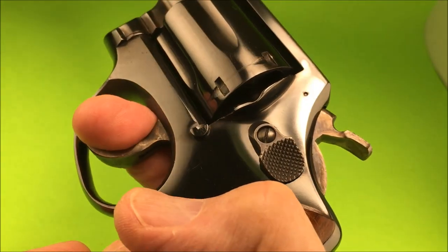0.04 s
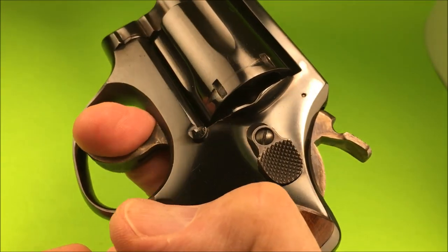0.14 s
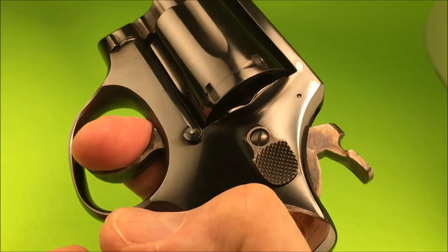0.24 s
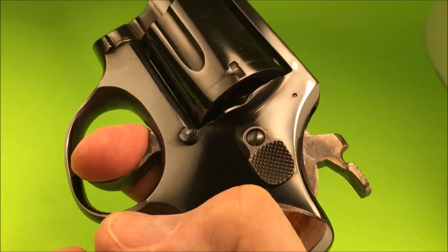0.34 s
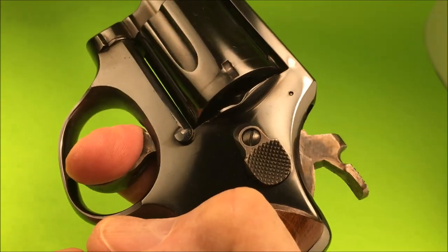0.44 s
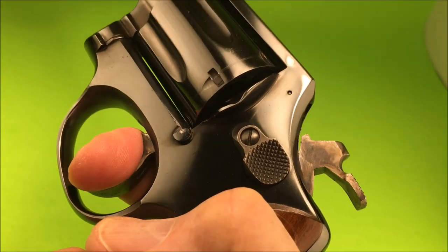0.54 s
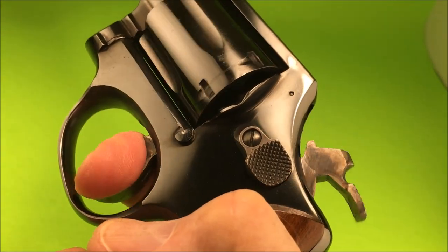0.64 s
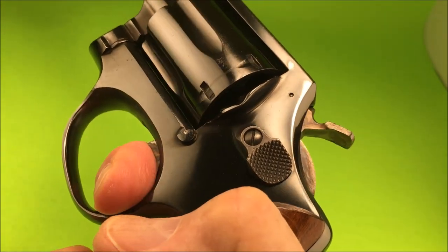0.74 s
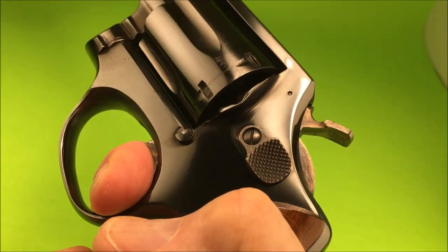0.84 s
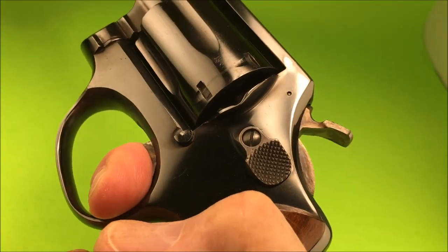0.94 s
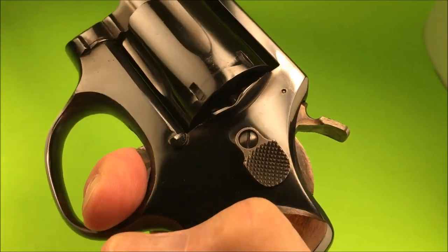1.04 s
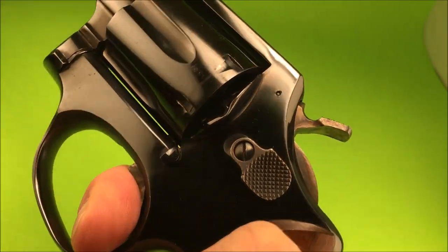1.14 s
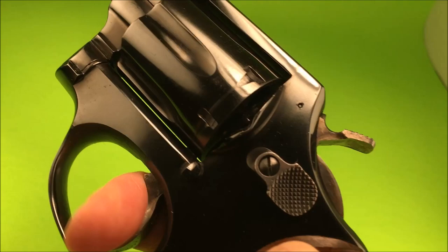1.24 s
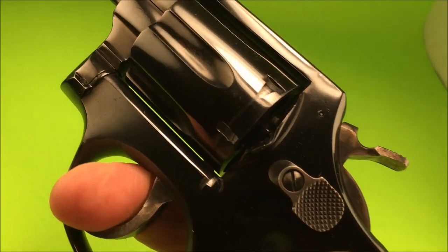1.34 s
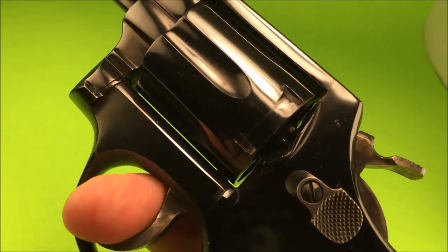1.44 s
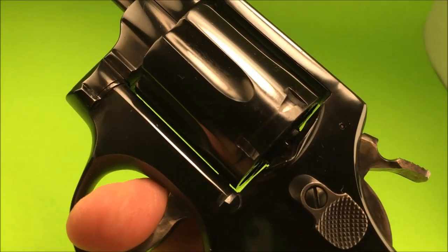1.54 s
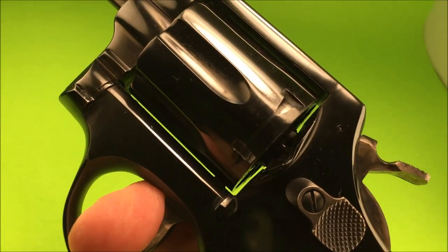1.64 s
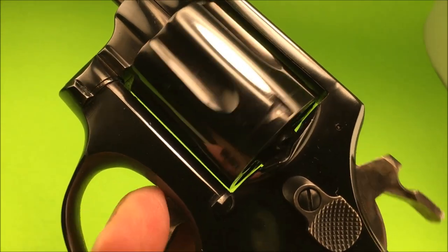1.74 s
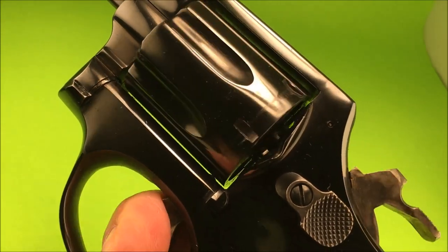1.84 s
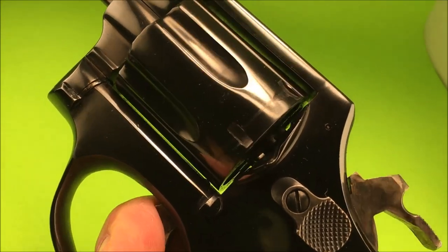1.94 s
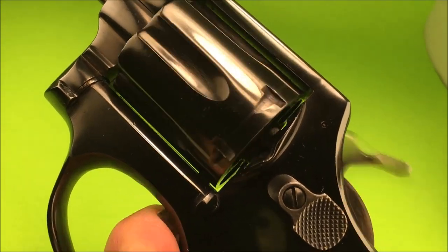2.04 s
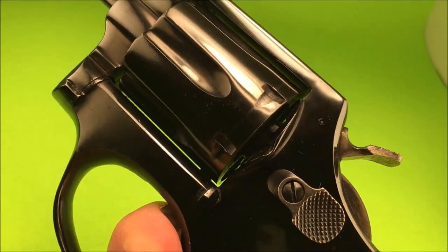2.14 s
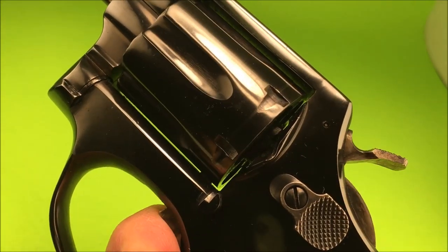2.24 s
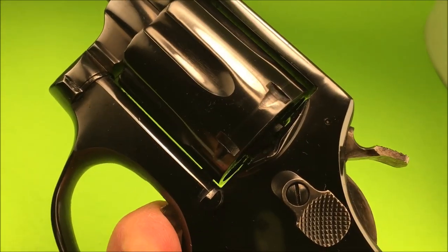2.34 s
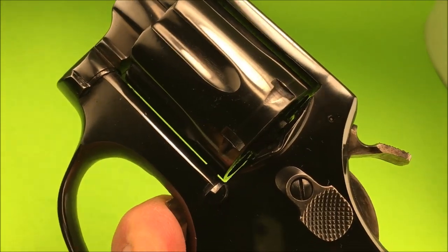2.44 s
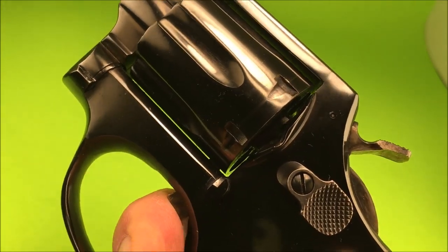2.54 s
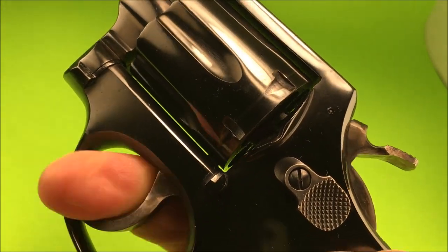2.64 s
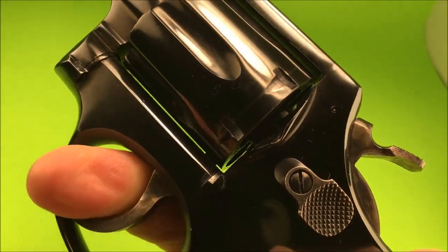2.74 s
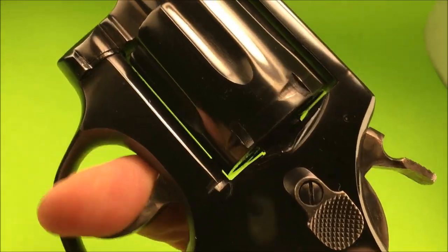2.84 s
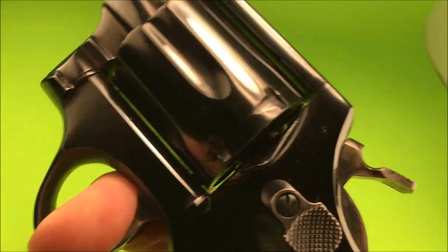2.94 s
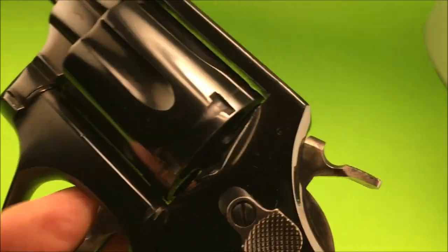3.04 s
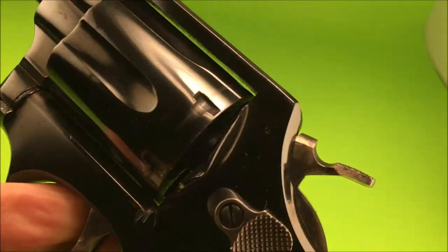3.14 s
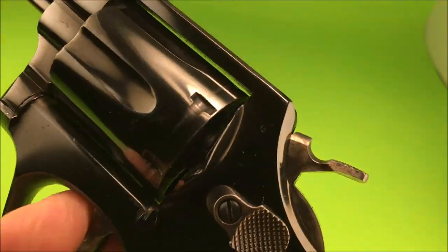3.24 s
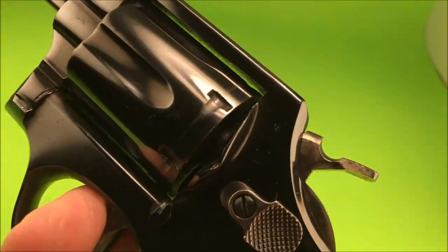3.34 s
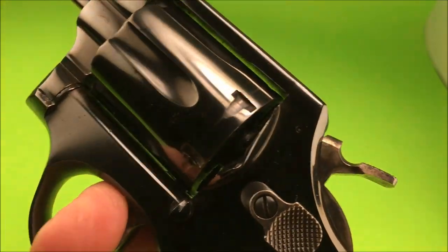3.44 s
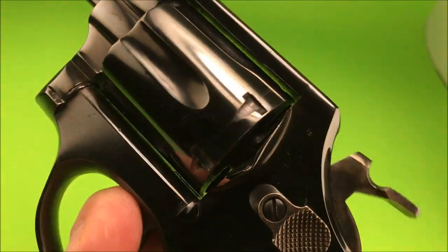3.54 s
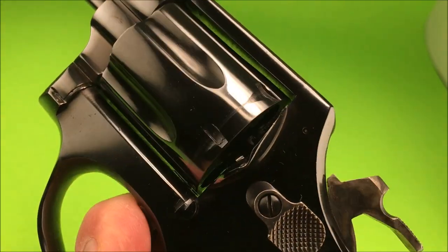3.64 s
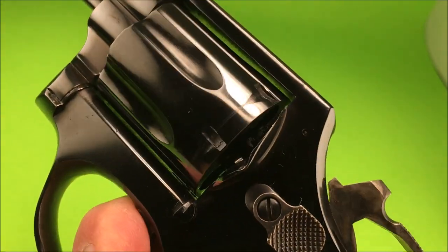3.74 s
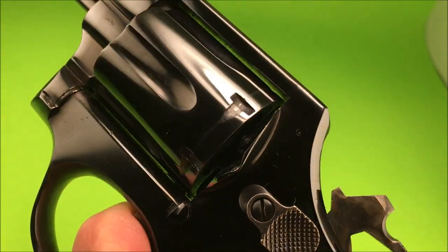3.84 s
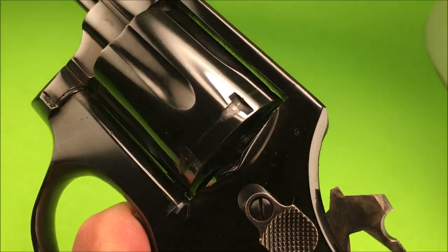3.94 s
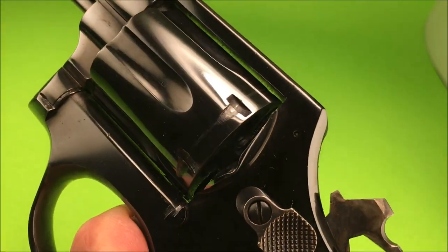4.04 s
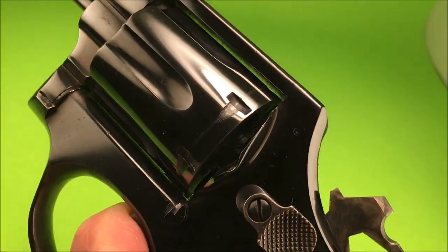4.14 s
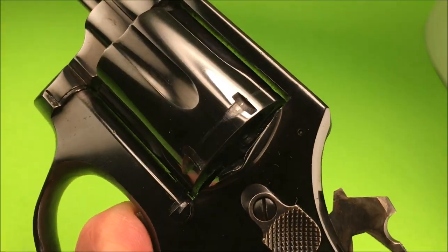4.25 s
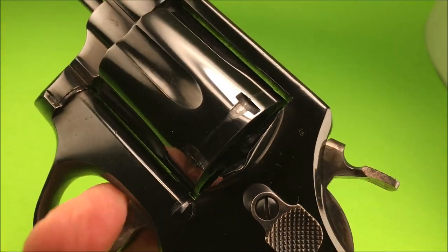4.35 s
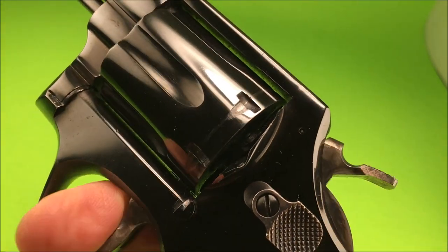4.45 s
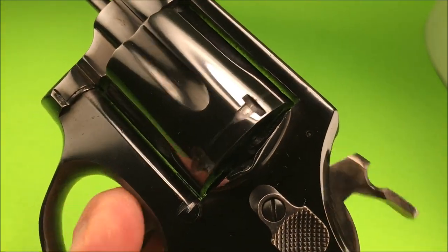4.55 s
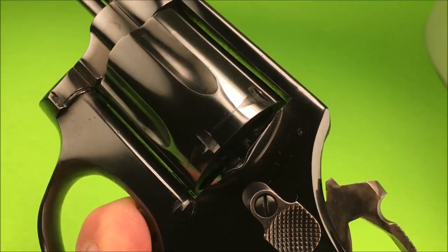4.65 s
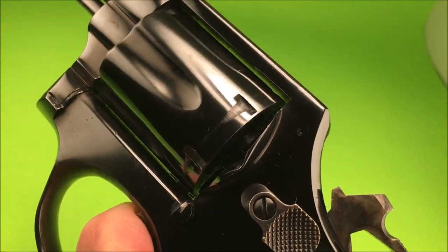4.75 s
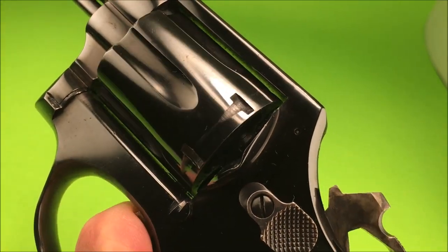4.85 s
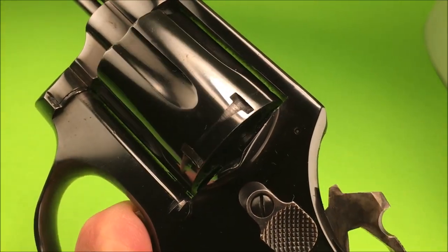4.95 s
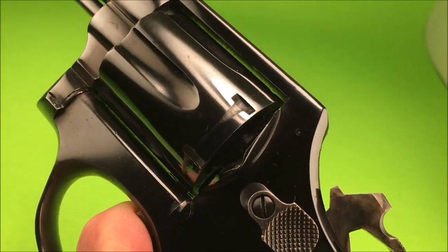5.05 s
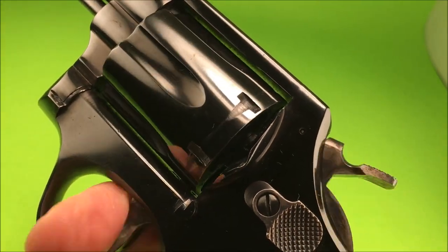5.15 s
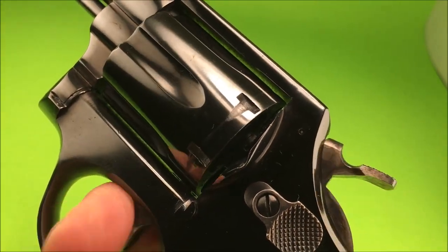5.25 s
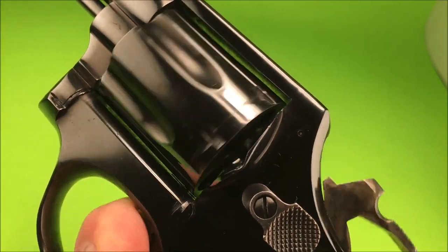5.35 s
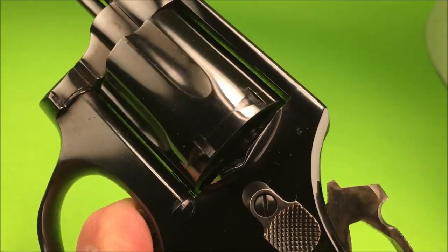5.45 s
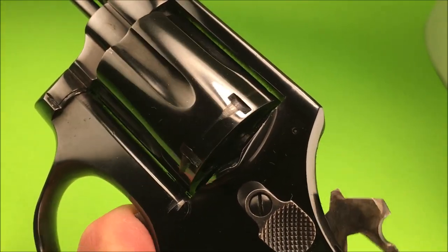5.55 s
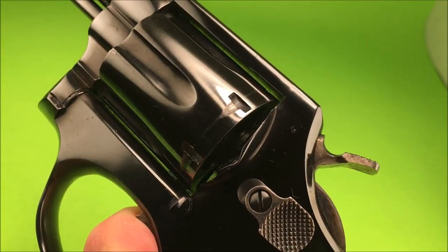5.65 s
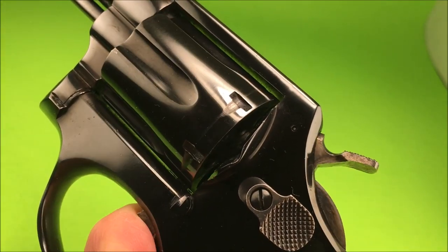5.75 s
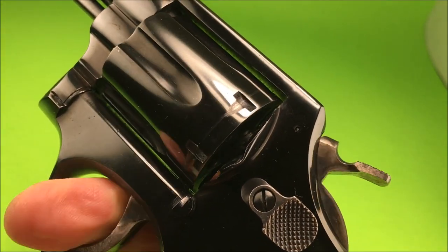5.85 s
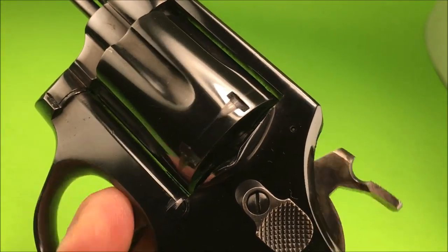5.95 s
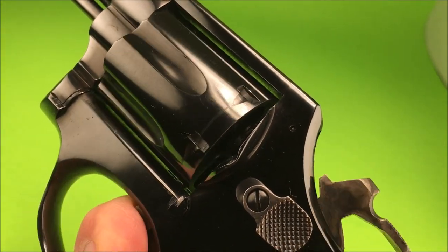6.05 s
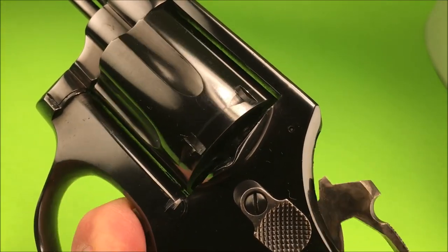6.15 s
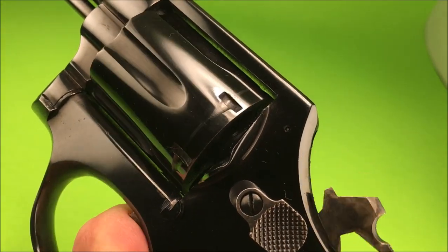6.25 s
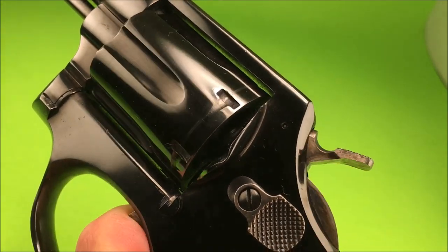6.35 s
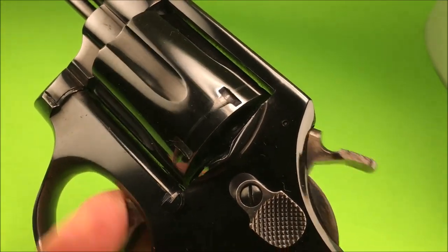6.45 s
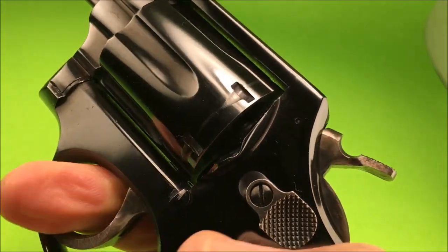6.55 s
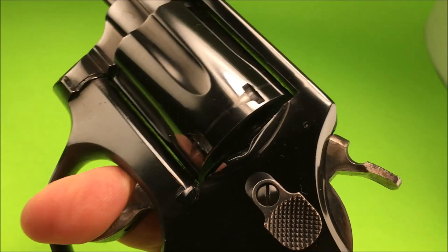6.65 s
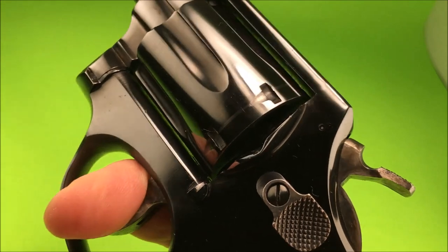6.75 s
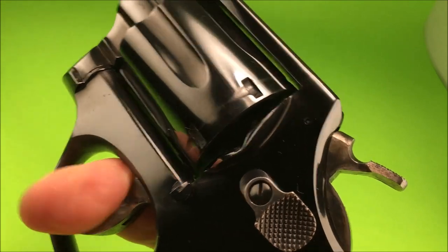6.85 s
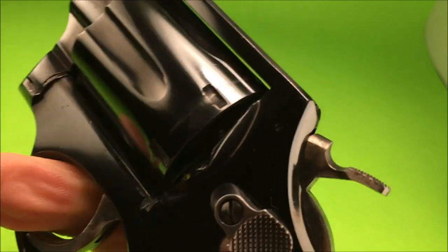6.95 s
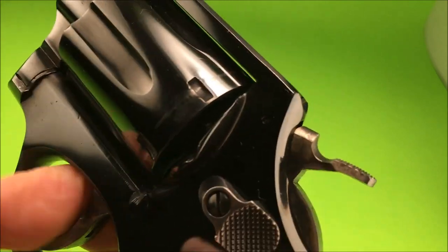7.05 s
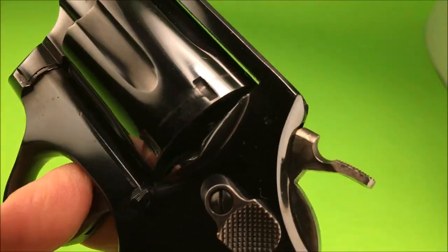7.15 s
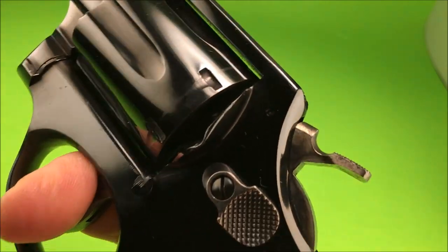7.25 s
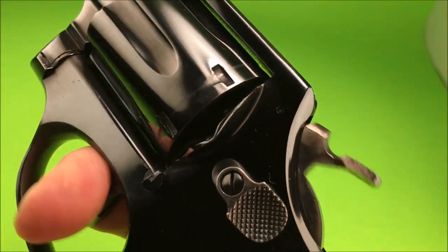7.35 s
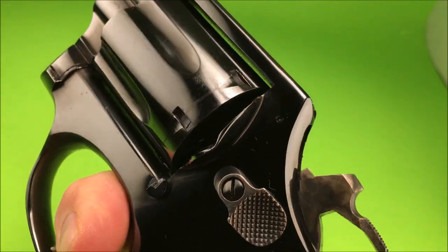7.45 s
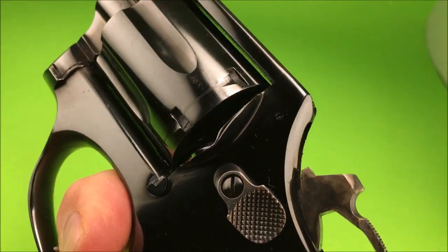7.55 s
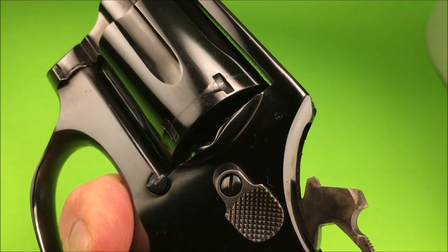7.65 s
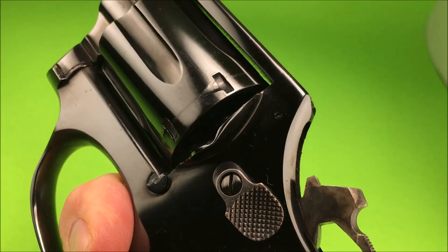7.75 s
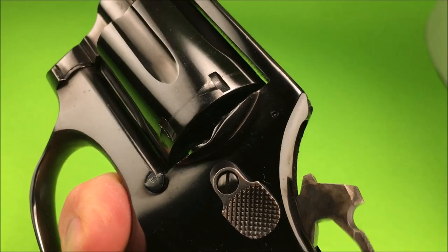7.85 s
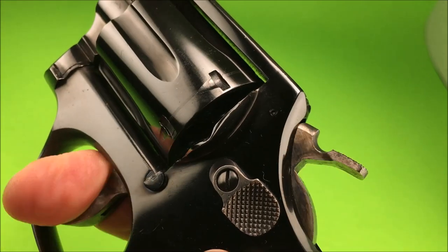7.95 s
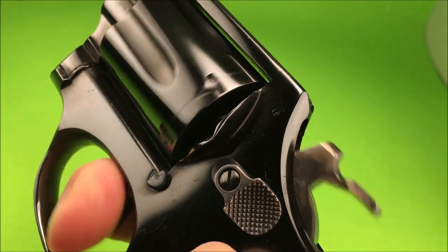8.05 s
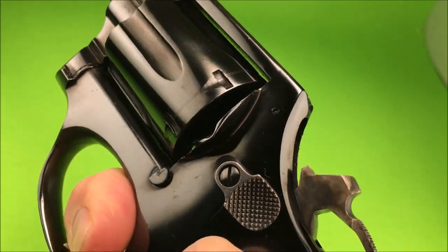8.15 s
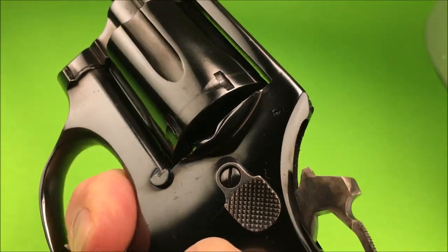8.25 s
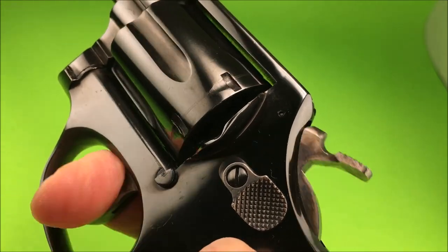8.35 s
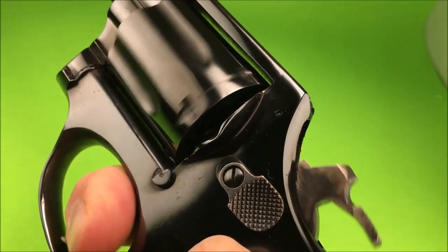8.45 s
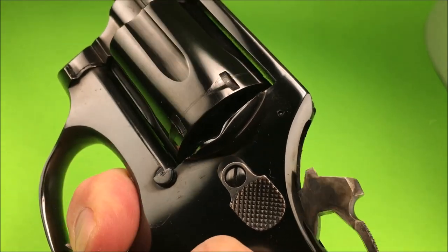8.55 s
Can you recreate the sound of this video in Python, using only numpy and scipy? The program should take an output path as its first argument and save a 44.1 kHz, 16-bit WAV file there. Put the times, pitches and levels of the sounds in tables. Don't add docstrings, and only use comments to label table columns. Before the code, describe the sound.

A handheld phone sits close to a revolver being manipulated. Trigger and cylinder parts tick, scrape and snap irregularly, dry and bright. Four times the hammer drops with a hard clack, a bassy bump through the hand and a brief metallic hum. Between them are double clicks and light rubbing. Room rumble dips after each thump, and soft hiss opens and closes around the louder clicks.

```python
import sys
import numpy as np
from scipy import signal
from scipy.fft import rfft, irfft
from scipy.io import wavfile
from scipy.ndimage import uniform_filter1d

SR = 44100
rng = np.random.default_rng(int(sys.argv[2]) if len(sys.argv) > 2 else 0)


def boost_factor(decibels):
    exponent = np.asarray(decibels, float) / 20
    return 10 ** exponent


def generate_wav(signal):
    frames = np.transpose(np.atleast_2d(signal))
    scaled = np.clip(frames, -1, 1) * 32767
    pcm = np.round(scaled).astype(np.int16)
    wavfile.write(sys.argv[1], SR, pcm)


N = 379260
T = np.arange(N) / SR

# [f/Hz, level/dB per Hz]
RUMBLE = [(15, -37.5), (25, -11.5), (48, 0.5), (75, -5.5), (113, -0.5), (150, -4), (198, -2), (269, -10),
          (374, -9.5), (520, -26.5), (680, -55.5), (1140, -120)]
AIR = [(290, -30), (500, -2), (700, -5.5), (1140, -8), (1230, -6.5), (1500, -12.5), (2300, -11.5),
       (3800, -17.5), (6000, -19.5), (9600, -22), (10450, -32), (11200, -24.5), (15400, -25),
       (16000, -34.5)]
HISS = [(410, -29.5), (700, -6.5), (1260, -8), (2100, -5.5), (2920, -8.5), (4050, -5.5), (4920, -10),
        (8880, -10.5), (16000, -20.5)]
# [opens t/s, shuts t/s, hiss level/dB]
GATE = [(0, 0.066, -7.5), (0.782, 1.029, -6), (0.995, 1.853, -0.5), (2.159, 2.626, -4), (2.37, 2.495, -6),
        (2.739, 3.159, -1), (3.94, 4.362, -1.5), (4.424, 6.162, -1), (6.151, 6.355, -4.5),
        (6.385, 6.874, 0.5), (6.878, 7.13, -2), (7.134, 7.396, -13.5), (7.73, 8.602, -1)]
# [t/s, f/Hz, level/dB, t60/s]
SHIMMERS = [
    (.02, 2000, -63, .25),
    (3.957, 4350, -42, .2),
    (4.463, 2100, -46, .15),
    (4.463, 4300, -46, .15),
    (4.871, 4300, -46, .25),
    (1.445, 8900, -42, .15),
    (8.463, 9000, -40, .12),
    (4.463, 8300, -38, .1),
]
# [t/s, peak level/dB, hardness/dB, ring f/Hz]
SLIPS = [(0.024, -57, -9, 2090), (.039, -54, -9, 2070), (.3095, -57, 6, 7000), (0.314, -53, 0, 5600),
         (0.33, -45.5, -18, 2060), (.338, -48, -13, 3040), (0.3516, -49, 4, 6300), (.362, -57, 1, 8000),
         (2.916, -51, -12, 2600), (2.9273, -46, -14, 2470), (2.938, -43, -16, 3450),
         (2.9473, -55, -3, 2300), (2.9632, -54, 6, 2070), (2.986, -41.5, -9, 5470), (3.1331, -56, -4, 2240),
         (3.1408, -42, 2, 6800), (3.145, -47, -11, 2030), (3.157, -48, -6, 1980), (3.6666, -52, -6, 6130),
         (3.6917, -47, 3, 6590), (3.703, -44, 3, 3940), (3.722, -44.5, 5, 2020), (4.692, -46, 0, 2840),
         (4.7022, -45.5, -4, 5210), (4.719, -50, -3, 5500), (5.4369, -49, -2, 3030),
         (5.449, -39.5, 5, 8530), (5.4568, -41.5, 3, 1960), (5.4617, -39, 7, 6760), (6.092, -57, 1, 1300),
         (6.104, -49, 6, 2840), (6.117, -50, 5, 5370), (6.1302, -55, 2, 3140), (6.8777, -53, -9, 2800),
         (6.8985, -51.5, -14, 2760), (6.9193, -49, -11, 2880), (7.184, -51, -10, 2390),
         (7.2903, -58.5, 2, 3130), (7.3116, -57, -1, 3200), (7.3318, -56, 4, 3820), (7.352, -56, 5, 2500),
         (7.3782, -59, 1, 4480), (7.5102, -44, -4, 7500), (7.5241, -48, 4, 2000),
         (7.5346, -39.5, 3.5, 2540), (7.5406, -43, 2, 5500), (7.5448, -41, 8, 8300), (8.19, -35.5, 8, 2930),
         (8.201, -51, -12, 3050), (7.146, -59, -14, 2000), (8.5355, -39, 2, 7000), (8.5765, -43, -4, 8100)]
# [start t/s, end t/s, level/dB, top f/Hz]
DRAGS = [
    (0.304, 0.41, -61, 10900),
    (2.902, 3.01, -59.5, 6500),
    (3.124, 3.182, -65, 5000),
    (3.66, 3.739, -57.5, 8940),
    (4.628, 4.744, -56.5, 9000),
    (5.412, 5.486, -54.5, 8950),
    (6.081, 6.14, -56.5, 8000),
    (7.471, 7.568, -54.5, 9000),
    (8.167, 8.218, -50, 10000),
]
CREAKS = [.268, 0.739, 1.469, 2.642, 3.252, 3.427, 3.496, 3.566, 3.582, 3.605, 3.931, 4.499, 6.554, 6.775,
          6.794, 6.856, 6.972, 7.274, 7.382, 7.48, 7.565, 7.767]
# [start t/s, end t/s, f/Hz, level/dB]
SCRAPES = [
    (.318, 0.325, 1250, -62),
    (7.465, 7.565, 1293, -62),
    (7.575, 7.585, 1200, -63),
    (8.172, 8.233, 1280, -60),
    (8.436, 8.453, 1300, -54.5),
    (8.545, 8.58, 1250, -58),
]
# [t/s, peak level/dB, hardness/dB, ring f/Hz]
CATCHES = [(0.3794, -41, 13, 8700), (0.4388, -40, -32, 3120), (1.367, -38.5, 9, 11860),
           (1.3745, -34.5, 4, 3040), (1.398, -29.5, 11, 6660), (1.833, -35, 4, 5730),
           (1.884, -37.5, -1, 4100), (2.6984, -29.5, 12, 6700), (2.7027, -28, 8, 6680),
           (2.723, -34.5, 5, 7030), (3.1633, -33, -5.5, 4040), (3.6558, -35, -26, 3540),
           (3.6588, -34, 9, 6760), (3.949, -33, -12, 2887), (4.429, -34, 5, 3300),
           (4.5955, -29.5, -0.5, 5900), (4.655, -31.5, 4.5, 6000), (5.4053, -34, 0, 2100),
           (5.8961, -40, 20, 8900), (5.9224, -35, 9, 11000), (6.0167, -38, 2, 2750), (6.067, -32, 1, 1920),
           (6.59, -27, 4.5, 8900), (6.977, -36, -5.5, 3436), (7.1905, -37, -7, 3810), (7.494, -31, 5, 4600),
           (7.984, -33.5, 4, 9550), (8.1162, -31, -0.5, 2230), (8.2296, -28, -15, 4600),
           (8.5258, -29, 2, 6100)]
# [t/s, peak level/dB, hardness/dB, ring f/Hz]
TICKS = [(0.3945, -47.5, -3, 3450), (0.526, -47, 7, 7400), (0.575, -47, -2.5, 5650),
         (1.413, -35.5, 8.5, 11650), (1.6956, -48, -8, 1390), (1.825, -45, -2, 2160),
         (1.8366, -33.5, 3.5, 10100), (1.866, -42.5, 5, 9000), (1.8764, -46, 1, 2020),
         (1.993, -52, -8, 2000), (2.718, -48, -1.5, 6800), (3.202, -49, 0.5, 9100),
         (3.646, -42.5, 3.5, 1380), (4.4355, -44, -2, 2840), (4.7551, -40.5, 2, 7600),
         (4.8604, -41, -14, 2830), (5.2259, -49, -8, 2900), (5.2329, -41.5, -4, 1990),
         (5.2849, -39.5, 7, 7800), (5.3484, -41, -7, 3870), (5.6174, -51.5, -12.5, 3020),
         (5.9008, -44.5, -9.5, 2310), (6.5764, -44, 5, 11000), (6.6224, -39.5, 4, 2030),
         (6.82, -51.5, -10, 4630), (6.9569, -51, -8, 2323), (7.9554, -49, -12, 2900), (8.184, -40, 1, 6600),
         (8.2169, -40, -2, 3420), (8.432, -39, -3.5, 3100)]
# [t/s, f/Hz, level/dB, t60/s]
SPRINGS = [(0.44, 2990, -54, 0.042), (1.4189, 1800, -27, .025), (1.4396, 1880, -26, 0.017),
           (1.44, 8830, -29, 0.046), (3.165, 1610, -48, .05), (4.4566, 2100, -25, 0.017),
           (4.4599, 6510, -11.5, .025), (4.459, 2223, -22.5, 0.025), (6.981, 3100, -47, 0.039),
           (6.9795, 2640, -40, .015), (6.9795, 3730, -41, .015), (7.494, 4570, -44, .05),
           (8.156, 2100, -47, 0.05), (8.4615, 2055, -19, 0.018), (5.9405, 3860, -23, .02),
           (.7975, 3150, -21, .025), (2.1665, 3800, -15, .015), (2.178, 7000, -16, .02),
           (8.463, 2025, -47, .12), (5.6472, 6500, -19, .02)]
# [t/s, peak level/dB, weight (lows over middle)/dB, chatter t60/ms, struck part f/Hz]
BLOWS = [(0.766, -33.5, 1.5, 44, 1409), (0.7708, -20.5, -19.5, 50, 9170), (0.785, -7, -6, 37, 4270),
         (0.7905, -9.5, 5.5, 19, 1370), (0.7972, -11.5, -5, 34, 7100), (0.801, -15.5, -25, 37, 10470),
         (2.1454, -27, -21, 26, 2970), (2.1547, -16.5, -10, 41, 9300), (2.1664, -8, -8.5, 14, 3830),
         (2.1703, -10.5, -8.5, 43, 4340), (2.1772, -7, -12.5, 13, 7130), (2.1834, -17.5, -12.5, 41, 2294),
         (5.647, -21, -16.5, 33, 6573), (5.6632, -35, 4.5, 35, 1956), (5.6768, -28, 1.5, 43, 1650),
         (5.6865, -8.5, -8.5, 13, 2206), (5.6907, -13, -6.5, 48, 8800), (6.3508, -38.5, -16, 20, 4500),
         (6.3592, -20.5, -16.5, 26, 6500), (6.3694, -28.5, -4, 11, 1900), (6.375, -37.5, -16.5, 5.8, 6500),
         (6.3799, -32, -11.5, 32, 2772), (6.3919, -7.5, -0.5, 52, 2109), (6.3969, -7.5, -8.5, 44, 2738)]
# [t/s, level/dB, f/Hz, cycles to -60 dB]
PUSHES = [(0.7899, -10, 1155, 3), (1.418, -31, 170, 3.5), (1.4386, -32, 297, 2), (2.1712, -3, 637, 5),
          (2.1729, -6.5, 190, 4), (5.9345, -29, 300, 4), (3.9555, -23, 400, 5), (.786, -12, 4304, 40),
          (3.9545, -16, 5770, 30), (4.4601, -12.5, 4190, 30), (3.655, -44.5, 995, 15),
          (4.868, -30, 200, 3.5), (5.254, -25, 190, 5), (5.687, -15, 397, 7), (6.598, -35.5, 597, 8.5),
          (7.74, -43, 170, 5.5), (8.4603, -30, 171, 6), (8.594, -21, 171, 5)]
# [t/s, peak level/dB]
CRACKS = [(.7863, -3), (.7909, -2), (.7971, -7), (.8, -9), (1.4393, -5), (2.1572, -14), (2.1669, -5),
          (3.9551, -1), (4.4605, -5), (4.4646, -10), (4.8686, -8), (4.8705, -11), (5.2573, -3),
          (5.6479, -11), (5.6643, -24), (5.6875, -3), (5.6939, -5), (5.9346, -12), (6.3516, -30),
          (6.3696, -21), (6.3754, -27), (6.3808, -25), (6.5977, -15), (8.0189, -12), (8.4624, -7)]
# [t/s, knock level/dB, knock f/Hz, thump delay t/s, thump level/dB, thump f/Hz]
FALLS = [
    (.788, -6, 250, .0065, -5, 47),
    (2.1683, -12, 200, .0067, -3, 57),
    (5.685, -6, 250, .0072, -5, 51),
    (6.3895, -18, 220, .007, -4.5, 50),
]
# [f/Hz, level/dB per Hz]
CYLINDER = [(1400, -22.5), (2250, -4), (2800, -12), (3450, -3), (4850, -17), (6300, -6), (7000, -1),
            (7700, -8), (8500, -2), (10000, -8), (10700, -4), (12500, -15), (13900, -5), (15700, -8),
            (16000, -20)]
# [f/Hz, level/dB, t60/s]
STEEL_RINGS = [(2340, -62, .52), (3180, -57, .32), (3650, -56, .38), (5770, -62, .23), (6930, -55, .36),
               (7250, -59, .27), (8420, -57, .3), (8680, -57, .3), (10700, -55, .32), (13920, -55, .18),
               (14680, -56, .2)]
# [t/s, peak level/dB, hardness (treble over middle)/dB, chatter t60/ms, ring f/Hz]
SNAPS = [(1.418, -13.5, 7, 17, 7550), (1.439, -10.5, 11.5, 9.6, 9580), (1.4405, -15, 10, 24, 8900),
         (2.7417, -12.5, 3.5, 18, 8050), (2.7488, -8, 8.5, 15.7, 9556), (3.9551, -12, 3.5, 15, 7500),
         (4.4559, -14.5, 2, 13, 13350), (4.4594, -6.5, 7.5, 26.5, 6593), (4.868, -15, 6.5, 24, 11190),
         (5.2532, -6.5, 12, 7.1, 13800), (5.2572, -9.5, 9.5, 27.5, 6855), (5.934, -19, 6, 22, 6500),
         (5.94, -14.5, 6.5, 14, 8960), (6.5979, -16.5, 6.5, 11.4, 8370), (7.739, -21, 4, 30, 8770),
         (8.011, -12.5, 5, 16.5, 11860), (8.0192, -11.5, 7.5, 17.6, 4920), (8.154, -23.5, 2, 19, 3650),
         (8.241, -22, 9, 27, 6630), (8.4507, -28, 9, 25, 8000), (8.4613, -9, 10, 6.3, 11150),
         (8.5937, -6.5, 5, 9.8, 6120)]
# [lows over middle/dB], one per snap
SNAP_WEIGHTS = [-12.5, -10.5, -13.5, -15.5, -7, -7, -20.5, -16, -14, -7.5, -11.5, -17, -20, -17.5, -21.5,
                -15, -17, -24, -22, -26, -11, -5]
# [start t/s, end t/s, final level/dB]
SLIDES = [(1.437, 1.448, -38), (2.678, 2.692, -55), (2.702, 2.75, -47), (3.946, 3.957, -44),
          (4.442, 4.454, -30), (4.461, 4.469, -24.5), (5.242, 5.25, -28.5), (6.588, 6.6, -52),
          (7.986, 8.027, -31), (8.124, 8.163, -48.5), (8.241, 8.248, -33.5), (1.86, 1.901, -49.5),
          (5.897, 5.916, -53), (8.443, 8.464, -33), (8.534, 8.569, -46.5), (8.565, 8.607, -42.5),
          (5.676, 5.683, -26), (3.955, 3.959, -25)]
# [f/Hz, level over direct sound/dB, t60/s]
FRAME = [(2250, -11, 0.0058), (3220, -15.5, 0.033), (4070, -3, 0.012), (4600, -2, 0.012),
         (5600, 0.5, 0.016), (6500, -1, 0.022), (7130, -2, 0.008), (8900, -2.5, 0.03),
         (10000, -3.5, 0.0012), (11860, -3, 0.0028), (13800, -9, 0.0078)]
# [f/Hz, level/dB per Hz]
AFTERRING = [(350, -41.5), (600, -15), (812, -24), (1160, -7.5), (1680, -13.5), (2040, -2.5), (3600, 0),
             (4850, -7), (6900, -1.5), (8700, -1.5), (12500, -11.5), (14500, -9.5), (16000, -18)]

TICK_WEIGHT_DB = -16
AIR_HOLD_S = 0.242
DUCK_AIR_DB = -11.5


def fade(t, t60):
    return np.exp(-np.log(1000) * t / t60)


def coloured(shape, size):
    hz, db = np.transpose(shape)
    f = np.maximum(np.fft.rfftfreq(size, 1 / SR), 1)
    gain = boost_factor(np.interp(np.log(f), np.log(hz), db))
    x = irfft(rfft(rng.standard_normal(size)) * gain, size)
    return x / x.std()


def band(x, lo_hz, hi_hz):
    return signal.sosfilt(signal.butter(2, [lo_hz, hi_hz], "band", fs=SR, output="sos"), x)


def hum_noise(size, lo_hz, hi_hz):
    hum = band(rng.standard_normal(size), lo_hz, hi_hz)
    return hum / hum.std()


def rough_grit(size, spread_db):
    return rng.standard_normal(size) * boost_factor(spread_db * rng.exponential(size=size))


def add(out, s, x):
    i = int(s * SR)
    out[..., i:i + x.shape[-1]] += x[..., :N - i]


def swelling(length):
    return np.sqrt(np.abs(np.sin(np.pi * np.clip(T[:5000] / length, 0, 1))))


def duck(depth_db, hold, recover=0.035):
    held = np.zeros(N)
    for fall in FALLS:
        drop = np.clip((T - fall[0]) / .01, 0, 1)
        release = np.clip((fall[0] + hold - T) / recover + .5, 0, 1)
        held = np.maximum(held, drop * release)
    return boost_factor(depth_db * held)


def ring(hz, db, t60):
    t = T[:1300]
    decay = fade(t, t60)
    return 2 * boost_factor(db) * np.sin(2 * np.pi * hz * t) * decay / decay.sum()


def headed(x):
    return x / x[:, :130].std(axis=1, keepdims=True)


def click(hard_db, weight_db, t60_ms, part_hz, part_db=9, part_cycles=24):
    t = T[:2600]
    spot = rng.standard_normal((len(FRAME), 2))
    rings = ring(part_hz, part_db, part_cycles / part_hz)
    for (hz, db, t60), (a, b) in zip(FRAME, spot):
        rings = rings + ring(hz * (1 + 0.016 * a), db + 2 * b, t60)
    rise = 1 - np.exp(-t * 1000 / 0.24)
    burst = rough_grit(len(t), 3.0) * rise * fade(t, 0.87 * max(t60_ms, 2) / 1000)
    burst = burst + boost_factor(10) * (np.arange(len(t)) == 10)
    both = np.array([burst + signal.fftconvolve(burst, rings)[:len(t)], burst])
    low = band(band(burst, 120, 1400), 100, 2900)
    mid = band(band(both, 1400, 6000), 1250, 16000)
    high = band(both, 4500, 16000)
    low = low / low[:220].std() + boost_factor(-4) * np.sin(2 * np.pi * 130 * t) * fade(t, 0.042)
    bright = headed(mid) + boost_factor(hard_db) * headed(high)
    peak = np.sqrt(uniform_filter1d(bright[0] ** 2, size=30).max())
    return (bright + boost_factor(weight_db) * low) / peak


def noise_gate():
    opened = sum(boost_factor(db) * ((T >= start) & (T < end)) for start, end, db in GATE)
    return uniform_filter1d(opened, size=400) * duck(-6, 0.48)


def room(gate):
    wander_db = coloured([(.3, 4.0), (3, 0.5), (8, -32.0), (20, -140)], N)
    rumble = coloured(RUMBLE, N) * boost_factor(-54 + wander_db) * duck(-15.5, 0.42, recover=0.48)
    air = coloured(AIR, N) * boost_factor(-70) * duck(DUCK_AIR_DB, AIR_HOLD_S)
    hiss = coloured(HISS, N) * boost_factor(-63) * gate
    return rumble + air + hiss


def appliance_whine():
    tone = np.sqrt(2) * np.sin(2 * np.pi * 1290 * T)
    return boost_factor(-82.5) * tone * duck(DUCK_AIR_DB, AIR_HOLD_S)


def shimmers(spread=0.091):
    out, t = np.zeros(N), T[:SR // 4]
    for s, hz, db, t60 in SHIMMERS:
        hum = hum_noise(len(t), hz * (1 - spread), hz * (1 + spread))
        add(out, s, boost_factor(db) * hum * fade(t, t60))
    return out


def slips_and_drags():
    out = np.zeros((2, N))
    for s, db, hard_db, part_hz in SLIPS:
        add(out, s, boost_factor(db) * click(hard_db, TICK_WEIGHT_DB, 12.2, part_hz, part_db=15.5, part_cycles=35))
    for start, end, db, top_hz in DRAGS:
        grit = band(rough_grit(5000, 3.3), 1050, top_hz)
        add(out, start, boost_factor(db) * grit / grit.std() * swelling(end - start))
    return out


def afterring(bursts, gate):
    t = T[:SR // 3]
    tail = boost_factor(-10) * fade(t, 0.043) + boost_factor(-30) * fade(t, 0.3)
    tail = tail * (1 - np.exp(-t / 0.00051)) / 20
    power = np.abs(signal.fftconvolve(bursts ** 2, tail ** 2)[:N])
    return coloured(AFTERRING, N) * np.sqrt(power) * (1.1 + 0.22 * gate) * duck(1, AIR_HOLD_S)


def creaks():
    out = np.zeros((2, N))
    for s in CREAKS:
        add(out, s, boost_factor(-58) * click(-2.5, TICK_WEIGHT_DB, 5.6, 3330))
    return out[0]


def scrapes():
    out = np.zeros(N)
    for start, end, hz, db in SCRAPES:
        add(out, start, boost_factor(db) * hum_noise(5000, .93 * hz, 1.03 * hz) * swelling(end - start))
    return out


def catches():
    out = np.zeros((2, N))
    for s, db, hard_db, part_hz in CATCHES:
        add(out, s, boost_factor(db) * click(hard_db, -19, 24.3, part_hz, part_db=8))
    return out


def ticks():
    out = np.zeros((2, N))
    for s, db, hard_db, part_hz in TICKS:
        add(out, s, boost_factor(db) * click(hard_db, TICK_WEIGHT_DB, 20, part_hz, part_db=8))
    return out


def springs():
    out, t = np.zeros(N), T[:SR // 4]
    for s, hz, db, t60 in SPRINGS:
        tone = np.sqrt(2) * np.sin(2 * np.pi * hz * t)
        rough = boost_factor(-3.5) * hum_noise(len(t), .95 * hz, 1.05 * hz)
        add(out, s, boost_factor(db) * (tone + rough) * fade(t, t60))
    return out


def hammer_blows():
    out = np.zeros((2, N))
    face_hz, glance_db_per_octave = 3540, 7.5
    for s, db, weight_db, t60_ms, part_hz in BLOWS:
        octaves = abs(np.log2(part_hz / face_hz))
        hard_db = -1.5 + glance_db_per_octave * octaves
        add(out, s, boost_factor(db) * click(hard_db, weight_db, t60_ms, part_hz))
    return out


def recoil_thumps():
    out, t = np.zeros(N), T[:SR // 2]
    for s, knock_db, knock_hz, delay, thump_db, thump_hz in FALLS:
        swing = band(rng.standard_normal(1000), 100, 450) * np.linspace(.25, 1, num=1000)
        add(out, s - 1000 / SR, boost_factor(-31.5) * swing / swing.std())
        knock = boost_factor(1.5) * np.sin(2 * np.pi * knock_hz * t)
        knock = knock + boost_factor(-0.5) * np.sin(2 * np.pi * 2.1 * knock_hz * t)
        add(out, s, boost_factor(knock_db) * knock * fade(t, 0.017))
        add(out, s + delay + 0.0035, boost_factor(-15.5) * np.sin(2 * np.pi * 30 * t) * fade(t, 0.067))
        turns = thump_hz * t + .33 * (1 - np.exp(-t / .004))
        size = np.exp(-(t / .0205) ** 2) + boost_factor(-40.5) * fade(t, 0.35)
        size = size * (1 - np.exp(-t / 0.00035))
        add(out, s + delay, -boost_factor(thump_db) * size * np.sin(2 * np.pi * turns))
    return out


def pushes():
    out, t = np.zeros(N), T[:3000]
    for s, db, hz, cycles in PUSHES:
        add(out, s, boost_factor(db) * np.sin(2 * np.pi * hz * t) * fade(t, cycles / hz))
    return out


def cracks():
    out = np.zeros(N)
    u = (T[:1300] - T[20]) * 1000 / .028
    spike = (u ** 2 - 1) * np.exp(-u ** 2 / 2)
    rings = sum(ring(*mode) for mode in FRAME)
    spike = spike + boost_factor(-7) * signal.fftconvolve(spike, rings)[:len(u)]
    for s, db in CRACKS:
        blow = any(0 < s - fall[0] + .002 < .02 for fall in FALLS)
        add(out, s - T[20], boost_factor(db) * spike * (-1 if blow else 1))
    return out


def cylinder():
    out, t = np.zeros(N), T[:SR // 3]
    for fall in FALLS:
        swell = (1 - np.exp(-t / .01)) * fade(t, 0.29)
        add(out, fall[0], boost_factor(-37) * coloured(CYLINDER, len(t)) * swell)
    return out


def steel_rings():
    out, t = np.zeros(N), T[:SR // 3]
    for fall in FALLS:
        for hz, db, t60 in STEEL_RINGS:
            pitch, size, turn = rng.standard_normal((3, 7, 1))
            crowd = boost_factor(3 * size) * np.sin(2 * np.pi * (hz * (1 + .013 * pitch) * t + turn))
            add(out, fall[0], boost_factor(db) * crowd.sum(axis=0) * (1 - np.exp(-t / .006)) * fade(t, t60))
    return out


def snaps():
    out = np.zeros((2, N))
    for (s, db, hard_db, t60_ms, part_hz), weight_db in zip(SNAPS, SNAP_WEIGHTS):
        add(out, s, boost_factor(db) * click(hard_db, weight_db, t60_ms, part_hz, part_db=2.0))
    return out


def slides():
    out, t = np.zeros(N), T[:2600]
    for start, end, db in SLIDES:
        grit = band(rough_grit(len(t), 1.3), 1500, 14000)
        length = end - start
        swell = boost_factor(np.interp(t, [0, length, length + 0.0036], [-14, 0, -60]))
        add(out, start, boost_factor(db) * swell * grit / grit.std())
    return out


def scene():
    gate = noise_gate()
    steel, bursts = slips_and_drags() + catches() + ticks() + hammer_blows() + snaps()
    background = room(gate) + appliance_whine()
    rubbing = creaks() + scrapes() + slides()
    impacts = steel + recoil_thumps() + pushes() + cracks()
    ringing = shimmers() + springs() + cylinder() + steel_rings() + afterring(bursts, gate)
    return (background + rubbing + impacts + ringing)[None]


def band_limit(x):
    return signal.sosfilt(signal.butter(12, 16820, fs=SR, output="sos"), x)


def record(dry):
    top = signal.ellip(6, .3, 32, 15750, fs=SR, output="sos")
    rounded = np.tanh(0.98 * signal.sosfilt(top, dry)) / 1.041
    return band_limit(rounded)


dry = scene()
out = record(dry)
generate_wav(out)
```